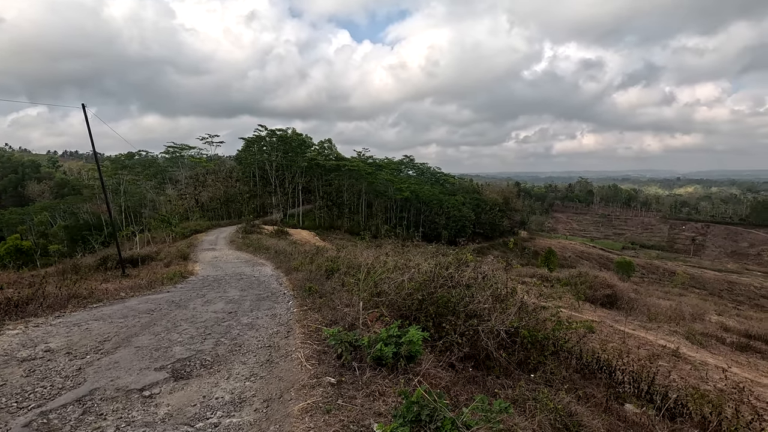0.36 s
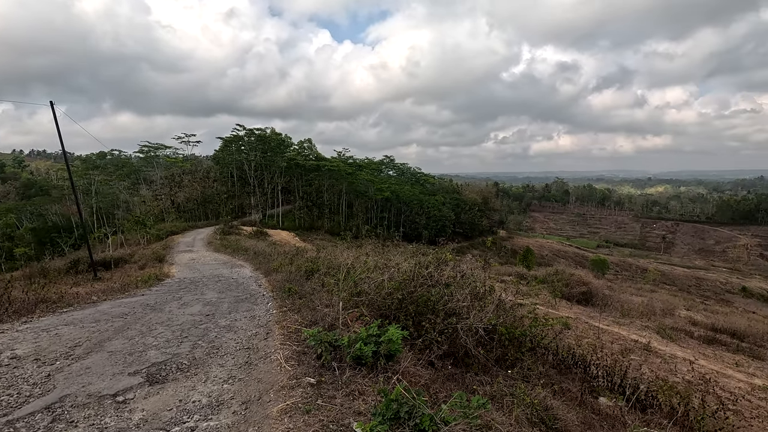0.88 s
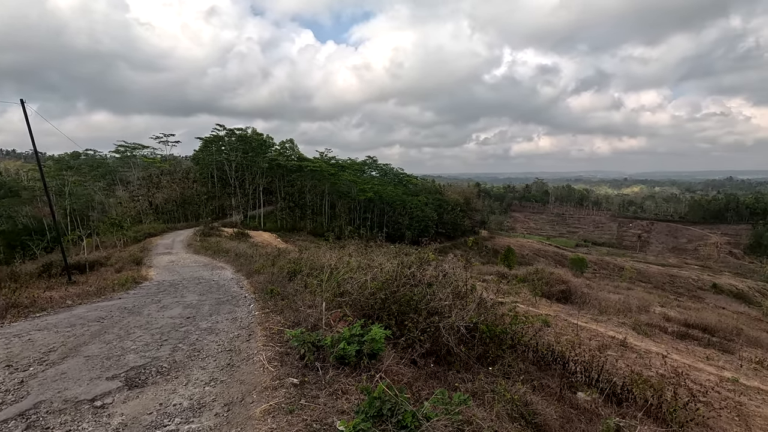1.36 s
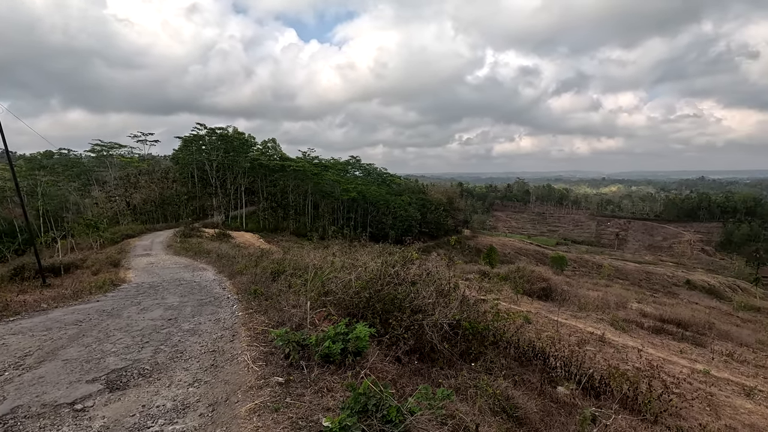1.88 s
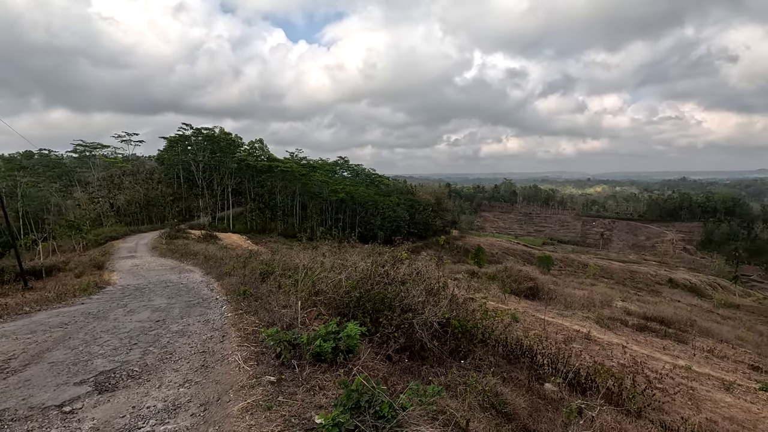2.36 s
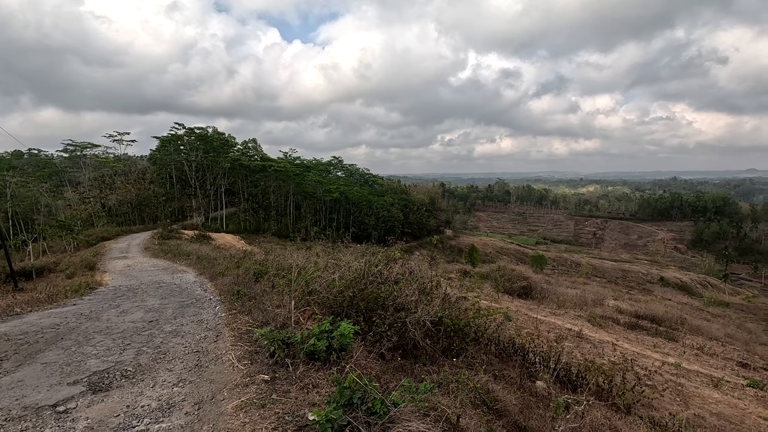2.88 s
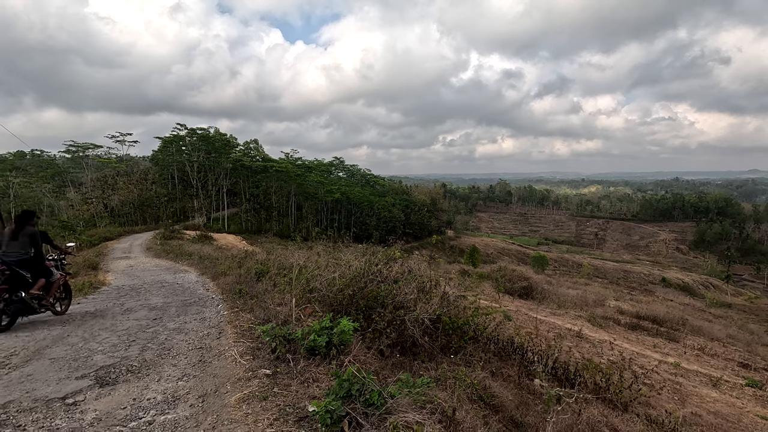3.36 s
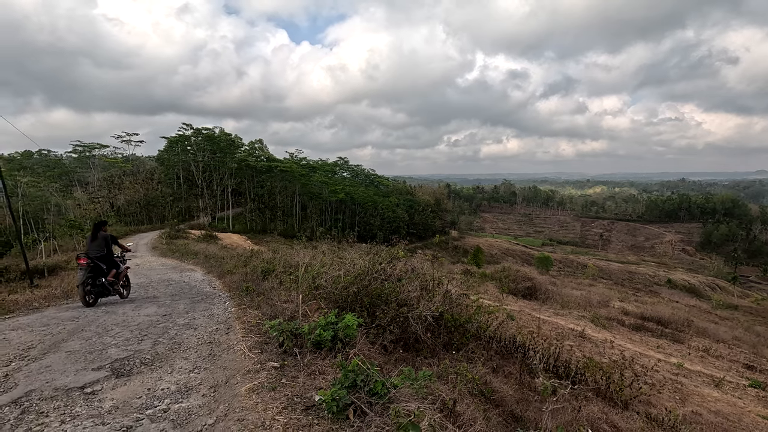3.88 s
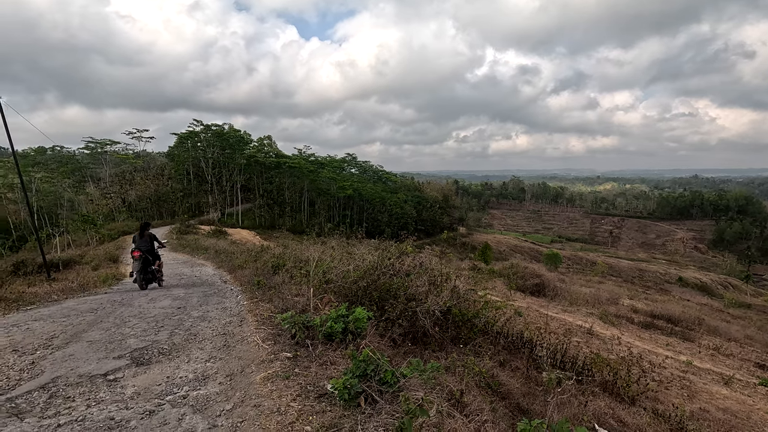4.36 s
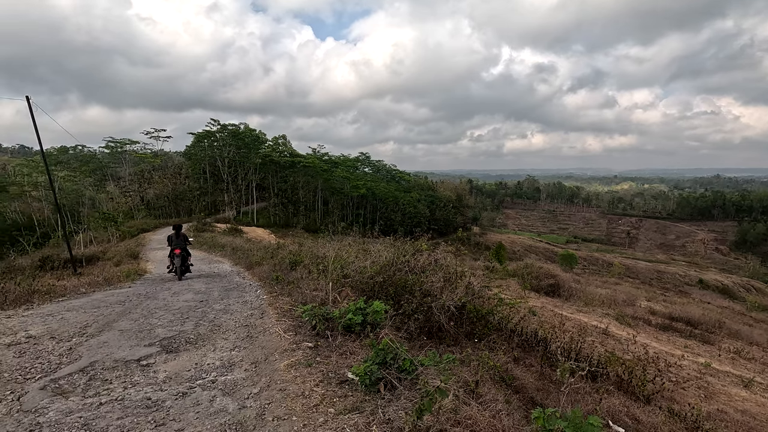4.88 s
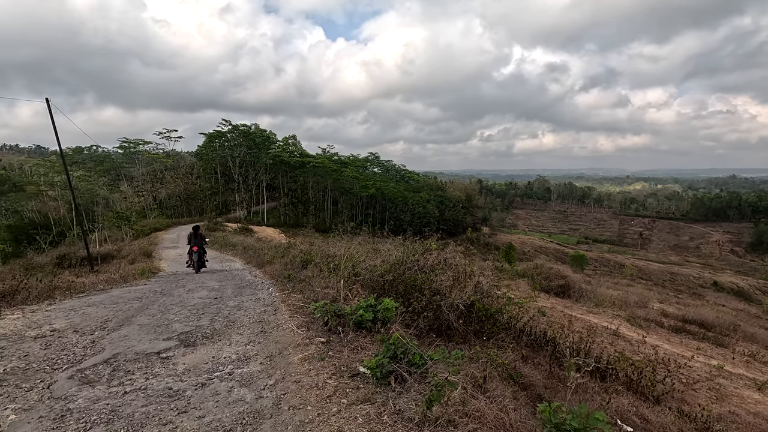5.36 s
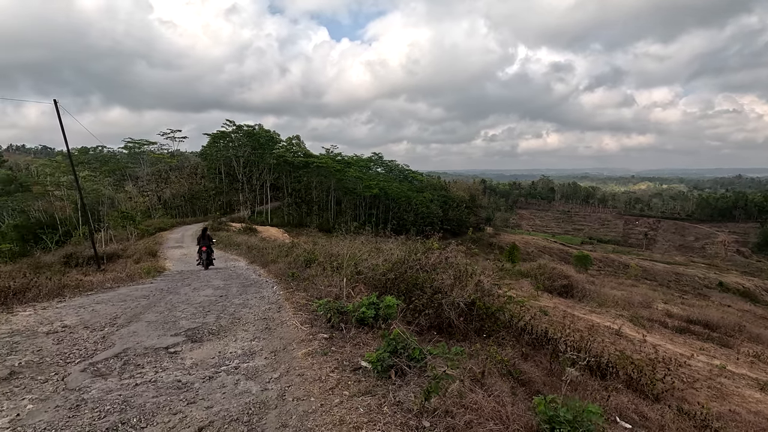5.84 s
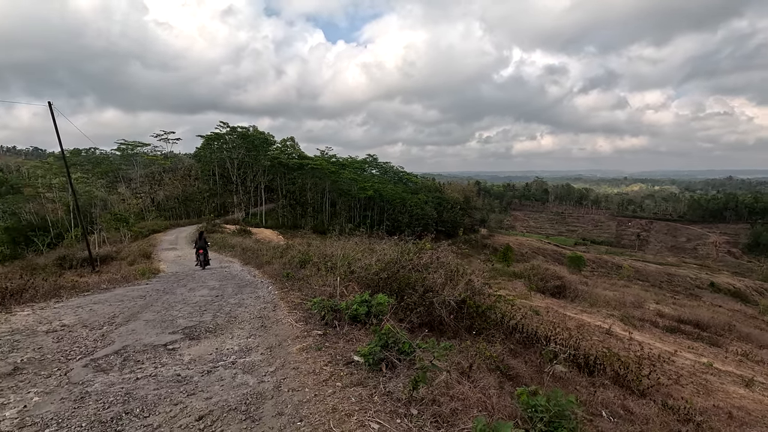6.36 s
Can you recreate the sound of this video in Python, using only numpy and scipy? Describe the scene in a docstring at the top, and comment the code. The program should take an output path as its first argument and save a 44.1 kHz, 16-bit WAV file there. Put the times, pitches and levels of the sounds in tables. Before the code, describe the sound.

Outdoors on an open hill track, a single-cylinder motorcycle chugs by at low speed, about thirteen deep thumps a second. Its raspy mechanical noise swells within the first second or so, loose parts clink over bumps and small stones tick under the tyres. After about three seconds it is heard from behind, tailpipe puffing, and slowly fades. Low wind gusts buffet the microphone; faint insects hiss in the scrub.

```python
"""A single-cylinder motorcycle idles slowly past on a stony hill track and rolls away.
Each firing sends a pulse through muffler and pipe; noise breathing with the cycle gives bark, puff, drone and rasp.
Low noise swells as gusts on the microphone; pulsing narrow bands are insects in the scrub, under a thin hiss.
Loose parts clink as decaying modes with a gritty crunch; stones click as short ticks of noise."""
import sys
import numpy as np
from scipy import signal
from scipy.fft import rfft, irfft, next_fast_len
from scipy.io import wavfile
from scipy.ndimage import uniform_filter1d, map_coordinates

SR = 44100
rng = np.random.default_rng(int(sys.argv[2]) if len(sys.argv) > 2 else 0)


def volts_from_decibels(level):
    """Turn decibel levels (scalar or array-like) into linear amplitude factors."""
    exponent = np.asarray(level, float) / 20
    return 10 ** exponent


def generate_wav(signal):
    """Clip the signal to [-1, 1] and save it as 16-bit WAV at the path in sys.argv[1]."""
    frames = np.transpose(np.atleast_2d(signal))
    scaled = np.clip(frames, -1, 1) * 32767
    pcm = np.round(scaled).astype(np.int16)
    wavfile.write(sys.argv[1], SR, pcm)


N = 296793
TIME_S = np.arange(N) / SR


def unit(x):
    """Scale to rms 1."""
    return x / np.sqrt(np.mean(x ** 2) + 1e-20)


def curves(rows):
    """One value per sample for each column after the time."""
    knot_s, *columns = np.transpose(rows)
    return [np.interp(TIME_S, knot_s, column) for column in columns]


def wobble(rate_hz):
    """A smooth random curve with rate_hz knots a second."""
    knots = rng.standard_normal(int(N * rate_hz / SR) + 4)
    return map_coordinates(knots, [np.arange(N) * rate_hz / SR])


def filtered(x, response):
    """x times a complex response of frequency."""
    size = next_fast_len(len(x) + 8192)
    spectrum = rfft(x, size) * response(np.fft.rfftfreq(size, 1 / SR))
    return irfft(spectrum, size)[:len(x)]


def colour(points):
    """Gain of (freq_hz, level_db) points on a log frequency axis."""
    freq_hz, level_db = np.transpose(points)
    return lambda f: volts_from_decibels(np.interp(np.log(f + 1), np.log(freq_hz + 1), level_db, -120, -120))


def resonances(modes):
    """Causal response of a sum of (center_hz, width_hz, level_db) band-pass modes."""
    return lambda f: sum(volts_from_decibels(db) * 1j * f * w / (c * c - f * f + 1j * f * w) for c, w, db in modes)


def twice(modes):
    """The modes passed through twice, for steeper skirts."""
    return lambda f: resonances(modes)(f) ** 2


def noise(response, patchy_db):
    """Coloured noise of rms 1 with time-frequency patches of random gain."""
    z = signal.stft(rng.standard_normal(N + 512), nperseg=512)[2]
    field = rng.standard_normal(z.shape)
    field = uniform_filter1d(uniform_filter1d(field, 5, 0), 5, 1)
    patchy = signal.istft(z * volts_from_decibels(patchy_db * unit(field)), nperseg=512)[1][:N]
    return unit(filtered(patchy, response))


# engine speed: start_s, firings_per_s
SPEED = [(0, 13.899), (1.1, 12.761), (1.3, 12.024), (1.76, 11.928), (2.14, 12.95), (2.36, 12.317),
         (4.24, 13.114), (4.48, 12.988), (5.77, 13.213), (5.87, 13.615), (6.73, 13.746)]
FIRST_FIRING_S = -0.0195


def firings():
    """Firing times follow the engine speed, with a little scatter from cycle to cycle."""
    t = FIRST_FIRING_S + np.arange(N + SR // 4) / SR
    done = np.cumsum(np.interp(t, *np.transpose(SPEED))) / SR
    smooth_s = np.interp(np.arange(int(done[-1])), done, t)
    return smooth_s + 0.00015 * rng.standard_normal(len(smooth_s))


# exhaust note: start_s, thump_db, upper_pipe_db, bark_db
EXHAUST_LEVELS = [(0, -27, -44, -50), (0.55, -22.5, -35, -57), (1.0, -22.5, -38.5, -56.5),
                  (1.9, -21, -39, -55.5), (2.25, -21.5, -36, -51.5), (2.6, -24, -39.5, -54.5),
                  (2.95, -23.5, -37, -50), (3.3, -23.5, -35, -52), (4.05, -26.5, -39, -53.5),
                  (4.22, -25.5, -33.5, -46), (4.4, -24.5, -37.5, -58), (5.2, -30, -42.5, -60),
                  (6.0, -32, -45, -60), (6.73, -36, -47.5, -61)]
# pitch of all pulse responses: start_s, pitch_factor
NOTE_PITCH = [(0, 1.025), (0.9, 1.007), (1.5, 0.979), (6.73, 1.053)]
# modes before the pitch factor: center_hz, width_hz, relative_db
EXHAUST_MODES = [(113.1, 17.3, 0)]
INTAKE_MODES = [(49.8, 8.9, -10.6)]
UPPER_PIPE_MODES = [(222.6, 40, -9), (258.8, 14.4, -2)]
# short ring of the tailpipe while it points this way: center_hz, width_hz, relative_db
PING_MODES = [(1580, 25, 0)]
PING_DB, PING_S, PING_HALF_S = -61, 3.45, .3  # loudest level, its moment, time to fall 6 dB


def muffler(f):
    """Pressure builds for a few ms, then vents through a chamber; baffles cut all above it."""
    build = np.exp(-2j * np.pi * f * .0028) / (1 - 1j * f / 83.6)
    chamber = 1 / (1 - (f / 141.6) ** 2 + 1j * f / 141.6 / 1.99)
    return build * chamber / (1 + (f / 325) ** 9)


def exhaust_note(times_s):
    """Each firing's pressure pulse excites the pipe modes with its own strength and pitch."""
    at = np.clip(np.round(times_s * SR).astype(int), 0, N - 1)
    lead = SR // 10  # room for the build-up ahead of each pulse
    pitch = curves(NOTE_PITCH)[0][at] + 0.016 * rng.standard_normal(len(at))

    def fired(level_db, scatter_db, response):
        """One pulse response, repeated at each firing."""
        out, k = np.zeros(N + SR), np.arange(-lead // 2, 2 * lead)
        shape = filtered(signal.unit_impulse(SR, lead), response)
        shape = shape / np.linalg.norm(shape) * np.sqrt(SR / 13)  # rms near 1 at 13 firings per s
        sizes = volts_from_decibels(level_db[at] + scatter_db * rng.standard_normal(len(at)))
        for s, size, factor in zip(times_s, sizes, pitch):
            out[round(s * SR) + lead + k] += size * np.interp(lead + k * factor, np.arange(SR), shape)
        return out[lead:lead + N]

    def pipe(f):
        """The intake sucks as the exhaust pushes."""
        return muffler(f) * (resonances(EXHAUST_MODES)(f) - resonances(INTAKE_MODES)(f))

    def upper_pipe(f):
        """Higher pipe modes behind the muffler."""
        return muffler(f) * resonances(UPPER_PIPE_MODES)(f)

    thump_db, upper_db, _ = curves(EXHAUST_LEVELS)
    ping_db = PING_DB - 6 * ((TIME_S - PING_S) / PING_HALF_S) ** 2
    note = fired(thump_db, 1.1, pipe) + fired(upper_db, 1.5, upper_pipe)
    return note + fired(ping_db, 3, resonances(PING_MODES))


# bark band, before doubling: center_hz, width_hz, relative_db
BARK_MODES = [(330, 133, 0)]


def bark(turn):
    """Mid-band noise that swells once per firing; turn is the firing phase in radians."""
    level_db = curves(EXHAUST_LEVELS)[2]
    breath = volts_from_decibels(1.6 * np.cos(turn - 1.1) + 2.5 * wobble(7))
    return volts_from_decibels(level_db) * unit(breath * noise(twice(BARK_MODES), patchy_db=-0.5))


# running noise: start_s, drone_db, rasp_db
RUNNING = [(0, -62, -53), (0.5, -56, -46), (0.8, -54.5, -43.5), (1.16, -43.5, -42.5), (1.6, -46, -44.5),
           (2.15, -53, -46), (2.36, -58, -48.5), (2.7, -50, -48), (3.0, -52, -49), (3.45, -49.5, -53),
           (3.85, -52, -55.5), (4.4, -46, -51), (4.7, -46, -54), (5.1, -47.5, -51.5), (5.5, -48.5, -54.5),
           (6.0, -45, -52), (6.25, -51, -56.5), (6.73, -46, -57.5)]
# share heard from behind, 0-1: start_s, share
BEHIND = [(0, 0.03), (1.9, 0.45), (2.6, 0.7), (3.3, 0.98), (5, 0.78), (6.73, 0.94)]
# tailpipe mouth, before doubling: center_hz, width_hz, relative_db
PUFF_MODES = [(1575, 460, 1.5), (2253, 370, -3)]
PUFF_FRONT_DB, PUFF_BEHIND_DB = -14, -6.5  # against the rasp


def puff(turn):
    """Gas leaves the tailpipe in a short turbulent puff just after each firing."""
    rasp_db = curves(RUNNING)[1]
    behind, = curves(BEHIND)
    since = (turn / (2 * np.pi) - .04) % 1  # in cycles
    envelope = (1 - np.exp(-since / 0.034)) * volts_from_decibels(-60 * since / 1.3 + 1.6 * wobble(13))
    level_db = rasp_db + PUFF_FRONT_DB + (PUFF_BEHIND_DB - PUFF_FRONT_DB) * behind
    return volts_from_decibels(level_db) * unit(envelope * noise(twice(PUFF_MODES), patchy_db=1.2))


# hollow drone, before doubling: center_hz, width_hz, relative_db
DRONE_MODES = [(579.6, 120, 1.3), (669, 114, 2), (743.7, 34, -0.64)]


def drone(turn, rattle):
    """Hollow resonant noise that breathes with the cycle and the shared rattle."""
    drone_db = curves(RUNNING)[0]
    breath = volts_from_decibels(1.9 * np.cos(turn - .6) + 1.2 * rattle + 0.37 * wobble(12))
    return volts_from_decibels(drone_db) * unit(breath * noise(twice(DRONE_MODES), patchy_db=1.0))


# rasp spectrum from the front and from behind: freq_hz, relative_db_per_hz
RASP_FRONT = [(250, -1.5), (420, -1), (567, -3.5), (928, -0.5), (1020, -2), (1360, -9.5), (2290, -9),
              (3350, -13.5), (5480, -23), (8370, -31), (11000, -36.5), (14300, -72.5), (22000, -120)]
RASP_BEHIND = [(480, -35.5), (820, -0.5), (1320, -2), (1470, -5.5), (1830, -3.5), (2650, -11),
               (3480, -12.5), (3790, -15), (6390, -21), (8380, -22), (11000, -29.5), (14300, -66.5),
               (22000, -120)]
# engine case resonances lifted out of the rasp: center_hz, width_hz, relative_db
CASE_FRONT = [(1220, 160, 0), (1990, 250, -7), (3350, 280, -6)]
CASE_BEHIND = [(1250, 200, -9), (1960, 260, -7), (3030, 350, -2), (3550, 220, -6)]


def rasp(turn, rattle):
    """Broad noise coloured by the engine case, crossfading at equal power from front to behind."""
    def cased(points, modes):
        """Spectrum with the case resonances added."""
        return lambda f: colour(points)(f) * (1 + resonances(modes)(f))

    rasp_db = curves(RUNNING)[1]
    behind, = curves(BEHIND)
    angle = np.pi / 2 * behind
    front = noise(cased(RASP_FRONT, CASE_FRONT), patchy_db=1.95)
    back = noise(cased(RASP_BEHIND, CASE_BEHIND), patchy_db=1.5)
    breath = volts_from_decibels(0.84 * np.cos(turn + 0.18) + 1.2 * rattle + 0.97 * wobble(200))
    return volts_from_decibels(rasp_db) * unit(breath * (np.cos(angle) * front + np.sin(angle) * back))


def engine():
    """One firing clock drives the exhaust pulses and the breathing of all running noise."""
    times_s = firings()
    turn = 2 * np.pi * np.interp(TIME_S, times_s, np.arange(len(times_s)))
    rattle = wobble(45)
    return exhaust_note(times_s) + bark(turn) + puff(turn) + drone(turn, rattle) + rasp(turn, rattle)


# gusts on the microphone, half_width_s to 1/e of the power: peak_s, level_db, half_width_s
GUSTS = [(0.09, -30, .04), (0.53, -30.5, .12), (1.12, -29, .1), (1.3, -30.5, .12), (1.62, -27.5, .07),
         (2.17, -32, .15), (2.61, -27, .06), (3.31, -23.5, .05), (3.45, -30, .06), (3.66, -29, .08),
         (4.68, -29, 0.037), (4.85, -28.5, .12), (5.15, -30, .1), (5.57, -27.5, 0.093), (5.8, -31.5, .12),
         (6.58, -35, .06)]
# buffeting spectrum: freq_hz, relative_db_per_hz
BUFFET = [(3, -19), (12, -2), (30, -1.5), (50, -1.5), (90, -2.5), (160, -13), (300, -32), (500, -61)]
BREEZE_DB = -38.5


def wind():
    """Lumpy low buffeting on the microphone: gusts swell out of a steady breeze."""
    power = volts_from_decibels(BREEZE_DB) ** 2
    for peak_s, level_db, half_width_s in GUSTS:
        power = power + volts_from_decibels(level_db) ** 2 * np.exp(-((TIME_S - peak_s) / half_width_s) ** 2)
    buffeting = volts_from_decibels(2.05 * wobble(12)) * noise(colour(BUFFET), patchy_db=0.95)
    return np.sqrt(power) * unit(buffeting)


# scrub: start_s, chorus_db, hiss_db (hiss before its flutter)
SCRUB = [(0, -63, -70), (0.5, -62, -67), (0.8, -62.5, -64), (2.3, -62, -67), (3.0, -64.5, -70),
         (3.8, -69, -79), (4.07, -68.5, -73), (4.35, -63.5, -86), (5.0, -67.5, -87), (5.8, -65, -90),
         (6.25, -74, -102), (6.73, -70, -101)]
# insect bands, width before doubling: center_hz, width_hz, relative_db
CHORUS = [(7205, 220, -2.5), (8230, 540, 0), (8770, 100, -7)]
# thin hiss spectrum: freq_hz, relative_db_per_hz
HISS = [(6180, -29), (10500, -7.5), (11400, -2.5), (12000, -10), (12900, 4.5), (14000, 5), (15000, 0),
        (15900, -3)]


def scrub():
    """Insects pulse in narrow noise bands; a thin fluttering hiss lies above them."""
    chorus_db, hiss_db = curves(SCRUB)
    chorus = np.zeros(N)
    for center_hz, width_hz, relative_db in CHORUS:
        band = noise(twice([(center_hz, width_hz, 0)]), patchy_db=1.5)
        chorus += volts_from_decibels(relative_db + 2.7 * wobble(40)) * band
    hiss = volts_from_decibels(hiss_db + 2.5 * wobble(14) + 1.5 * wobble(4)) * noise(colour(HISS), patchy_db=2.5)
    return volts_from_decibels(chorus_db) * unit(chorus) + hiss


# loudest clinks of loose parts over the bumps, level before ring and crunch gains: start_s, level_db, pitch_hz
CLINKS = [(0.1084, -42, 1250), (0.1209, -36.5, 1220), (0.4849, -40, 1510), (0.5306, -34, 1080),
          (0.6, -35, 1260), (0.84, -29, 1140), (0.9897, -36, 1210), (1.2306, -36, 1080), (1.303, -29, 1960),
          (1.335, -33, 800), (1.494, -39, 1940), (1.517, -35, 1004), (1.7586, -37, 1350),
          (1.931, -27.5, 966), (2.063, -32.5, 1890), (2.3271, -32, 887), (2.5172, -28.5, 1050),
          (2.545, -38, 1850), (2.5705, -30.5, 1760), (2.589, -31, 1800), (2.615, -35, 920),
          (2.801, -29, 1850), (2.995, -29.5, 1695), (3.0582, -36, 1850), (3.0738, -30.5, 2960),
          (4.775, -36, 1020), (5.043, -41, 1490), (5.2865, -41.5, 2310), (5.5882, -39, 940),
          (5.926, -39, 1300), (6.0026, -38.5, 2230), (6.07, -37, 1760), (6.095, -35, 2030),
          (6.1228, -32, 1330)]
# modes of the loose parts, before scatter: pitch_hz, relative_db, t60_s
RING = [(720, -11.5, 0.14), (1107, -18.5, 0.022), (1378, -8, 0.023), (1844, -2, 0.07), (2346, -5, 0.044),
        (2900, 1.5, 0.044), (3480, -6.5, 0.025), (4400, -8.5, .03)]
FAINT_CLINK_DB, FAINT_CLINK_HZ = 7, 1050  # random clinks: center level over the rasp, base pitch
CLEAN_DB, GRIT_PER_DB = -20, 0.03  # the softer a blow under this, the grittier


def clinks():
    """A blow excites the modes near its own pitch and a gritty crunch of noise around it."""
    out, t = np.zeros(N + SR), np.arange(SR // 8) / SR
    draw = rng.random((45, 3))
    rasp_db = curves(RUNNING)[1][(draw[:, 0] * N).astype(int)]
    faint_db = rasp_db + FAINT_CLINK_DB + 6 * (draw[:, 1] - .5)
    faint_hz = FAINT_CLINK_HZ * 1.6 ** (draw[:, 2] - .4)
    faint = np.c_[draw[:, 0] * N / SR, faint_db, faint_hz]
    for start_s, level_db, blow_hz in np.vstack([CLINKS, faint]):
        def near_db(hz):
            """Loss of 9 dB per octave away from the blow."""
            return -9 * abs(np.log2(hz / blow_hz + 1e-3))

        ring = np.zeros(len(t))
        for mode_hz, mode_db, t60_s in RING:
            decay = volts_from_decibels(mode_db + near_db(mode_hz) + rng.normal(0, 2.8) - 60 * t / t60_s)
            ring += decay * np.sin(2 * np.pi * mode_hz * rng.normal(1, 0.017) * t)
        burst = unit(filtered(rng.standard_normal(len(t)), lambda f: volts_from_decibels(1.55 * near_db(f))))
        crunch = 1.3 * volts_from_decibels(-60 * t / 0.066) * burst
        grit = np.clip(GRIT_PER_DB * (CLEAN_DB - level_db), 0, 1)
        blow = (1 - np.exp(-t / 0.0006)) * ((1 - grit) * ring + grit * crunch)
        out[round(start_s * SR):][:len(t)] += volts_from_decibels(level_db) * blow
    return out[:N]


# loudest stone clicks, level before tick spectrum and gain: start_s, level_db
STONES = [(0.5985, -42), (0.822, -43), (0.9243, -43.5), (1.3732, -46.5), (1.601, -35), (1.7574, -43.5),
          (2.185, -42.5), (2.279, -39), (2.51, -33), (2.6836, -41.5), (2.9985, -37.5), (3.048, -41.5),
          (3.141, -42), (3.159, -45), (3.3807, -47), (4.0924, -44.5), (4.671, -42.5), (4.7402, -42),
          (4.7877, -47.5), (4.8284, -44), (5.0823, -45.5), (5.125, -44), (5.1457, -38.5), (5.1986, -44.5),
          (5.3048, -46), (5.544, -41.5), (5.931, -44), (6.0062, -46), (6.124, -42.5)]
# tick spectrum: freq_hz, relative_db_per_hz
TICK = [(1470, -25.5), (2500, 0), (4190, -4), (5120, -6.5), (6070, -3), (7650, -7.5), (9000, 0),
        (10500, -6), (12500, -7), (15800, -12)]
FAINT_STONE_DB, STONE_TAIL_DB = -62.5, 4  # floor and exponential spread of the random clicks, same reference


def stones():
    """Each click is a dry tick of noise; many fainter ones fall at random."""
    ticks, t = np.zeros(N + SR), np.arange(SR // 16) / SR
    draw = rng.random((140, 2))
    faint_db = FAINT_STONE_DB - STONE_TAIL_DB * np.log(1 - .97 * draw[:, 1])
    faint = np.c_[draw[:, 0] * N / SR, faint_db]
    for start_s, level_db in np.vstack([STONES, faint]):
        envelope = volts_from_decibels(level_db - 60 * t / 0.039) * (1 - np.exp(-t / 0.0022))
        ticks[round(start_s * SR):][:len(t)] += envelope * rng.standard_normal(len(t))
    bright = volts_from_decibels(7.5) * filtered(ticks[:N], colour(TICK))
    dull = filtered(bright, lambda f: 1 / (1 + (f / 12300) ** 8))
    later = np.clip(TIME_S - 3.2, 0, 1)  # the later clicks lose their top, fading to dull from 3.2 to 4.2 s
    return (1 - later) * bright + later * dull


# brief left-right difference, half_width_s to -6 dB: center_s, half_width_s, gain_db, top_hz
SIDE_BURSTS = [(.12, .18, -15, 9000), (.8, .2, -38, 600), (4.0, .05, -21, 1200), (4.22, .1, -19, 1200),
               (4.65, .15, -36, 700)]


def side_bursts(near):
    """A random-phase copy of the sound, low-passed and let through in brief bursts."""
    def scatter(f):
        """Coloured gain with a random phase per frequency."""
        gain_db = 8 - 20 / (1 + (f / 170) ** 4) - 14 / (1 + (600 / (f + 1)) ** 3)
        return volts_from_decibels(gain_db) * np.exp(2j * np.pi * rng.random(len(f)))

    scrambled = filtered(near, scatter)
    side = np.zeros(N)
    for center_s, half_width_s, gain_db, top_hz in SIDE_BURSTS:
        swell = volts_from_decibels(gain_db - 6 * ((TIME_S - center_s) / half_width_s) ** 4)
        side += swell * signal.lfilter(*signal.butter(3, top_hz, fs=SR), scrambled)
    return side


RIGHT_TOP_HZ, RIGHT_TOP_DB = 11900, -16  # the right port is muffled above this


def right_port(x):
    """The right port lacks the top."""
    return filtered(x, lambda f: volts_from_decibels(RIGHT_TOP_DB / (1 + (RIGHT_TOP_HZ / (f + 1)) ** 30)))


def scene():
    """All sources arrive alike left and right, but for brief side bursts and a duller right."""
    near = engine() + wind() + scrub() + clinks() + stones()
    side = side_bursts(near)
    return np.array([near + side, right_port(near - side)])


def roll_off(x):
    """The treble ends steeply here."""
    return signal.sosfilt(signal.butter(12, 16100, fs=SR, output="sos"), x)


def record(dry):
    """A fast gain control hears the bass and ducks the treble while a thump rings."""
    bass = np.abs(filtered(dry.mean(0), lambda f: f < 300))
    fast = np.abs(uniform_filter1d(bass, size=SR // 50))
    slow = np.abs(uniform_filter1d(bass, size=SR // 4))
    duck = (1 + (fast / slow) ** 2.8) ** -.25
    treble = np.array([filtered(port, lambda f: 1 / (1 + (5500 / (f + 1)) ** 6)) for port in dry])
    mix = dry + (0.79 * duck - 1) * treble
    return roll_off(mix)


dry = scene()
out = record(dry)
generate_wav(out)
```